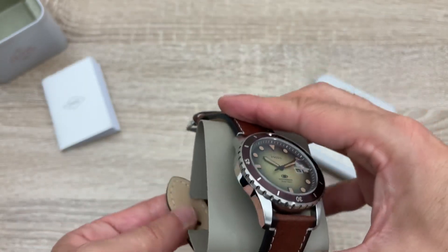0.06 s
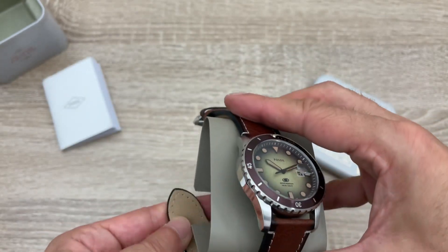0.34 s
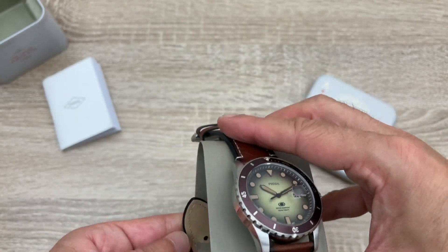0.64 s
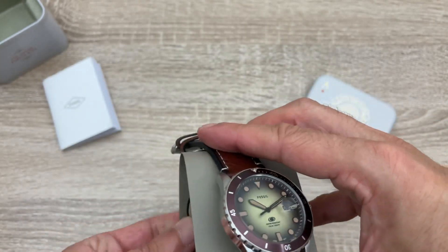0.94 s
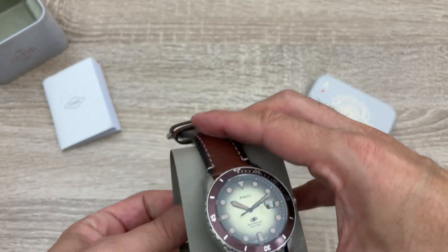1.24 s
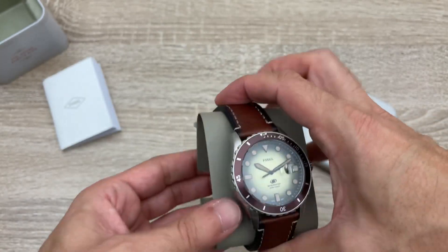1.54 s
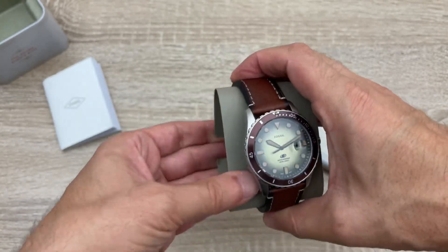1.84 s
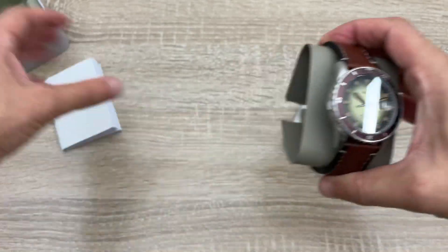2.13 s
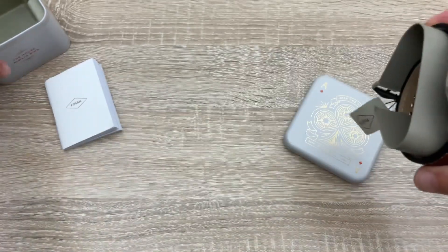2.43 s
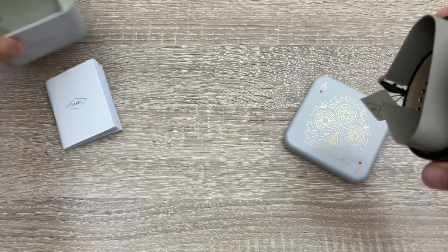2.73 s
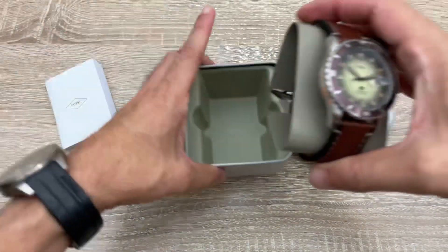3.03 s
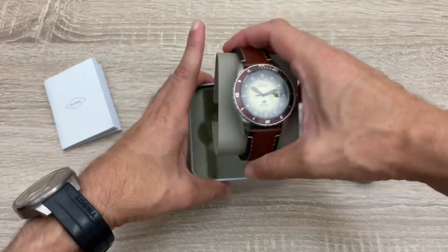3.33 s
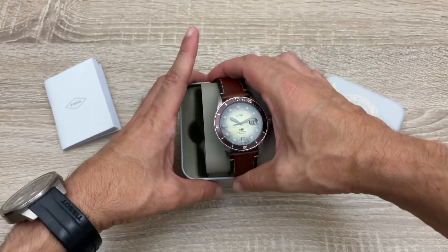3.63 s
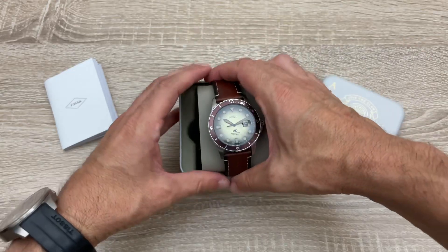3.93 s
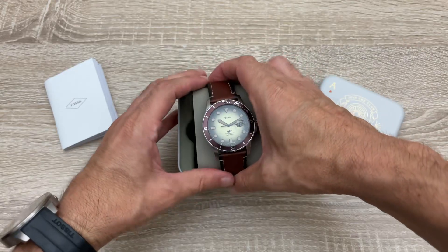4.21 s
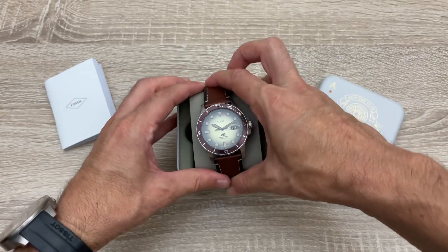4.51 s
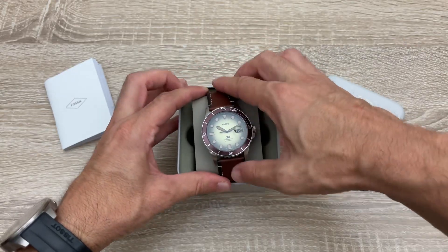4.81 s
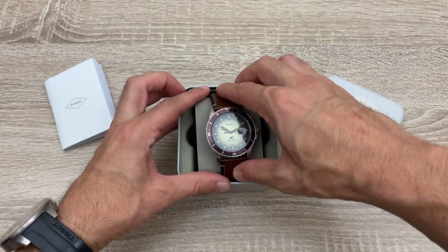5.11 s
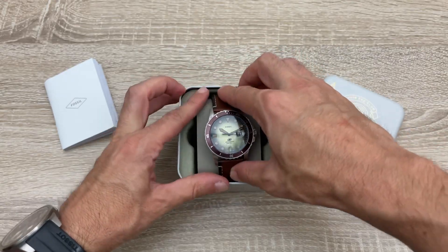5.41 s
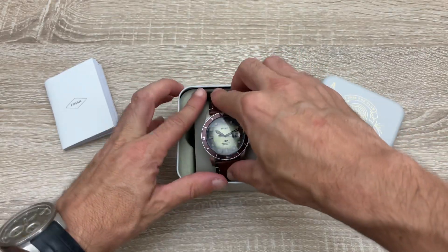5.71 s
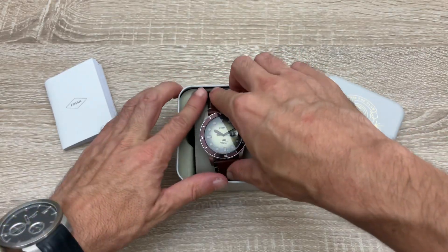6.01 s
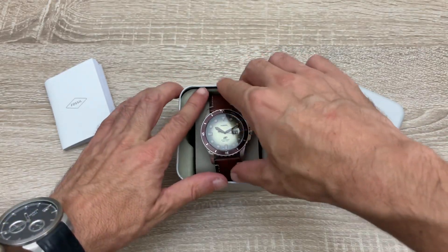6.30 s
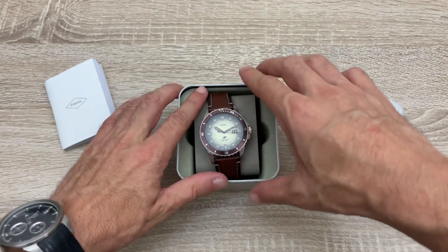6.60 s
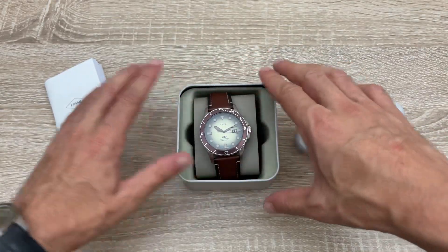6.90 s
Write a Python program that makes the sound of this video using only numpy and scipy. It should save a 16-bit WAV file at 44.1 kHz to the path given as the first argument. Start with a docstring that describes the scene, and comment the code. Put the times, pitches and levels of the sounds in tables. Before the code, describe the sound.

In a small room with a low hum, fingers slide over a leather watch strap while its buckle ticks and clinks. A metal tin then scrapes, lifts and lands on a wooden table with two quick ringing clanks. Short, damped knocks and soft rubbing follow at uneven intervals as the watch and its cushion are pushed inside, ending with a few faint buckle clicks. Everything is heard close, in stereo.

```python
"""Packing a watch into a tin

A watch strapped round a leather cushion is handled over a wooden table: the strap rubs and creaks,
and the steel buckle clicks. An empty tin is picked up and set down, edge first, then flat, ringing
and thumping the table. The cushion is worked into it with scrapes and dull knocks that the grip damps.
A small room echoes and hums low, and a stereo microphone hears it all from close by."""
import sys
import numpy as np
from scipy import signal
from scipy.fft import rfft, irfft
from scipy.io import wavfile
from scipy.ndimage import uniform_filter1d

SR = 44100
rng = np.random.default_rng(int(sys.argv[2]) if len(sys.argv) > 2 else 0)


def generate_wav(signal):
    """Clip the signal to [-1, 1] and save it as 16-bit WAV at the path in sys.argv[1]."""
    frames = np.transpose(np.atleast_2d(signal))
    scaled = np.clip(frames, -1, 1) * 32767
    pcm = np.round(scaled).astype(np.int16)
    wavfile.write(sys.argv[1], SR, pcm)


N = 306495

# A ring time (t60) is how long a sound takes to fade by 60 dB.
FREE_T60_S, GRIPPED_T60_S = 0.46, 0.25  # longest ring of a loose thing and of one held in the hand
# How alike the room sounds left and right. Each row: frequency in Hz, likeness from 0 to 1.
ROOM_LIKENESS = [(100, 1), (300, 0.44), (700, 0.054), (2000, 0.35), (5000, 1), (12000, 1)]


def tin():
    """Set down, the tin rings freely; gripped, it gives short knocks that sound its air and one panel."""
    # The tin lands on its edge, then flat. Each row: start in seconds, level in dB, flatness from 0 to 1,
    # hollow pitch in Hz, hollow boost in dB, clank, tick and fizz in dB, rise and clatter time in
    # seconds, metal ring in dB, table thud in dB.
    landings = [(3.086, 16.5, .2, 1230, 9.5, -17.5, -18.5, -32, 0.00077, 0.067, -2, 18.5),
                (3.115, -1, 0.1, 1030, 8, -0.5, -17, -28, 0.0013, 0.54, 7, -6),
                (3.26, 18.5, .8, 1040, 5.5, -4, -26, -44.5, 0.00015, 0.056, -11, 14.5),
                (3.274, 3.5, .2, 945, 3.5, 0.5, -22, -46, .003, 0.69, -12, -6)]
    # Fingers and cushion bump the tin. Each row: start in seconds, level in dB, hollow pitch in Hz,
    # hollow boost, clank, fizz and table thud in dB, panel pitch in Hz, its level in dB, its ring time
    # in seconds.
    knocks = [(2.531, 5, 796, 6, -36, -59, 1.5, 1134, -43.5, 0.09),
              (2.559, 4.5, 760, 4.5, -28.5, -66, 0.5, 2380, -59.5, 0.14),
              (2.893, -15.5, 900, 12, -27, -30.5, -18, 1260, -46.5, 0.031),
              (3.635, 4.5, 724, 6, -21.5, -67, 1, 1090, -59, 0.048),
              (3.7198, 7, 1000, 7, -13, -55, 0.5, 1100, -44.5, 0.048),
              (4.3047, -0.5, 770, 6, -14.5, -50, -15, 1640, -46, 0.036),
              (4.441, -13, 634, 9, -29, -47, -18, 1440, -60, 0.037),
              (4.4656, 7, 660, 6.5, -23, -38, -0.5, 1750, -45, .04),
              (4.479, 11.5, 843, 8, -17.5, -66, 2, 1595, -32.5, .04),
              (4.6696, 10.5, 807, 11, -25.5, -46, -20, 1656, -39.5, 0.043),
              (4.8167, 7.5, 1940, 9, -18.5, -23.5, 0, 1885, -43, 0.12),
              (4.8195, 4, 720, 5, -30, -55, -6, 2340, -50, 0.06),
              (5.2571, -1.5, 700, 1, -29, -52, -0.5, 1240, -64, .04),
              (5.3188, -7, 925, 12, -5, -25, -26, 1483, -41.5, 0.048),
              (5.3586, 12, 890, 5, -13.5, -26, -7, 1493, -31.5, 0.05),
              (5.3809, 16.5, 720, 1.5, -27, -38.5, 14, 530, -31.5, 0.051),
              (5.396, 2, 550, 11, -23, -50, 2, 586, -35, .04),
              (6.203, 5.5, 770, 5, -29, -40.5, -4, 1674, -47, 0.052),
              (6.2312, 1, 760, 3, -19, -47, -6, 1580, -47, 0.048),
              (6.32, 0.5, 960, 5.5, -17, -27.5, -16.5, 1170, -53, 0.041)]
    out = np.zeros(N)
    for start, *landing in landings:
        add(out, start, strike(*landing, FREE_T60_S))
    for start, db, hollow_hz, hollow_db, clank, fizz, thud_db, panel_hz, panel_db, panel_t60 in knocks:
        tick = (clank + fizz) / 2 - 1
        rise = 0.00013 * 2 ** (-clank / 16)  # 16 dB less clank: the knock swells twice as slowly
        knock = strike(db, 0, hollow_hz, hollow_db, clank, tick, fizz, rise,
                       t60=0.046, ring_db=-20.5, thud_db=thud_db, longest_s=GRIPPED_T60_S)
        air_hoot = note(hollow_hz, db + hollow_db - 58.5, t60=0.04, rise=rise)
        add(out, start, knock)
        add(out, start, air_hoot + note(panel_hz, panel_db, panel_t60, rise))
    return out


def strike(db, flat, hollow_hz, hollow_db, clank, tick, fizz, rise, t60, ring_db, thud_db, longest_s):
    """One hit sounds the hollow tin, rings its metal and thumps the table; a flat hit clatters more."""
    # The tones of the tin. Each row: pitch in Hz, strength in dB, ring time in seconds.
    tin_modes = [(524, -44, 0.2), (885, -60, 0.25), (1012, -47, 0.34), (1070, -49, 0.32), (1266, -49, 0.3),
                 (1470, -44, .09), (1705, -54, 0.3), (1976, -37, 0.15), (2240, -53, .2), (2358, -50, .35),
                 (2643, -55, .45), (3010, -55, .3), (3607, -51, 0.45), (3763, -43, 0.26), (4344, -49, 0.32),
                 (4515, -46, 0.22), (4748, -41, 0.18), (4931, -43, 0.28), (4990, -40, 0.3),
                 (5087, -47, 0.32), (5216, -48, .32), (5717, -52, 0.38), (5841, -47, 0.3),
                 (6560, -49, 0.27), (8340, -45, 0.13), (8651, -42, 0.33), (9119, -36, .25),
                 (10250, -45, .35), (10700, -46, .45)]
    # The tones of the table top. Each row: pitch in Hz, strength in dB, ring time in seconds.
    table_modes = [(95.6, -59, 0.12), (118, -50, 0.11), (146.6, -55.5, 0.13), (210.3, -57.5, 0.15),
                   (263, -50, 0.14), (400.6, -49, 0.069)]
    # Resonances of the tin's floor. Each row: pitch in Hz, half width in Hz, boost in dB.
    floor_peaks = [(550, 20, 5.5), (750, 20, 10), (888, 26, 8.5), (1074, 52, 12.5), (1536, 71, 13.5),
                   (1715, 34, 10), (2020, 40, 9), (2320, 67, 11.5), (2775, 29, 3.5)]
    hz = np.geomspace(60, 16000, num=700)
    slope = [(60, -33), (340, -16), (540, -7.5), (760, -3), (1050, -9), (1400, clank / 2 - 4),
             (2200, clank), (3200, (clank + tick) / 2), (4000, tick), (5500, tick - 3),
             (7300, fizz - 1), (11000, fizz), (13500, fizz - 17), (16000, fizz - 19)]
    box_db = read(slope, hz) + hump(hz, hollow_hz, 0.12 * hollow_hz, hollow_db)
    floor_db = flat * sum(hump(hz, *peak) for peak in floor_peaks)
    colour = np.column_stack([hz, box_db])
    clatter_colour = np.column_stack([hz, box_db + floor_db])
    metal = ring(tin_modes, colour, longest_s)
    # The tin is almost square, so each tone beats against a slightly detuned twin.
    metal += amp(-8.5) * ring(tin_modes, colour, longest_s, spread=0.0091)
    out = amp(db + ring_db) * (metal + shimmer(colour))
    add(out, 0, amp(db) * blow(clatter_colour, rise, t60, snap=0.27))
    thud = ring(table_modes, [(100, 0.067), (400, 0.86)], FREE_T60_S, spread=0.053)
    add(out, 0.0101, amp(thud_db) * thud)  # the heavy table top answers a little late
    return out


def shimmer(colour, db=-51.5, t60=0.24, count=70):
    """Thin sheet metal rings with many weak, high tones."""
    pitches = rng.uniform(2500, 12000, count)
    levels = db + 3 * rng.standard_normal(count)
    return ring(np.column_stack([pitches, levels, np.full(count, t60)]), colour, t60)


def scraping():
    """The tin scrapes on the table, then fingers and cushion rub against it."""
    # The shoves. Each row: start and length in seconds, body level in dB, hiss in dB against the body.
    shoves = [(2.518, 0.12, -52, -24), (3.65, 0.2, -53, -25), (3.915, 0.1, -66, -22),
              (4.045, 0.044, -76.5, -10.5), (4.19, 0.7, -68.5, -7), (4.38, 0.38, -68.5, -3),
              (4.44, 0.13, -52.5, -20), (4.64, 0.19, -62, -6), (4.7, 0.07, -60, -6.5),
              (5.03, 0.17, -58, -11), (5.2, 0.18, -70.5, 2), (5.45, 0.26, -68, -8), (5.7, 0.19, -57, -16),
              (5.98, 0.34, -59, -12), (6.325, 0.072, -58.5, -2), (6.37, 0.16, -64, -7.5),
              (6.68, 0.16, -72.5, -16)]
    # Faint rubbing as the cushion is pressed in. Each row: time in seconds, level in dB.
    pressing = [(3.602, -64), (3.95, -67), (4.15, -73), (4.448, -68.5), (5.6, -58.5), (5.95, -81),
                (6.302, -65), (6.95, -94)]
    # The tone colour of the scraping. Each row: frequency in Hz, level in dB.
    colour = [(150, -4.5), (300, -8.5), (600, -4.5), (850, -4), (1200, -15), (1500, -10.5), (2600, -22.5),
              (5500, -35), (6700, -32.5), (7500, -55), (8600, -38.5), (10400, -40), (12700, -54),
              (14000, -57)]
    pressing_db = np.interp(np.arange(N) / SR, *np.transpose(pressing), left=-np.inf)
    gains = strokes(shoves) + amp([pressing_db, pressing_db - 20.5])  # body, hiss
    return rub(gains, colour, bands=[(450, 4100), (3500, 6600)], split_hz=3600,
               grains_per_s=1200, grain_db=2.0, smooth=0.86, judder_db=1.93)


def buckle():
    """Each click rings the little steel frame and pings at a pitch set by where it is touched."""
    # The clicks. Each row: start in seconds, level, body and fizz in dB, rise in seconds,
    # ping pitch in Hz, ping level in dB, ping ring time in seconds.
    clicks = [(0.079, -28, 2.5, -18, 0.0016, 2690, -68, 0.045),
              (0.3009, -35, 21, -13, 0.00045, 1860, -47, .03),
              (0.3308, -2, -12.5, -18.5, 0.00074, 2760, -39.5, 0.036),
              (0.39, -17.5, -10, -23, 0.0012, 2760, -52, 0.035),
              (.698, -33, 4.5, -23, 0.0016, 3650, -61, .04),
              (0.8732, -12.5, 1.5, -2, 0.0016, 1850, -36, 0.044),
              (0.8771, -15.5, 10, -9, 0.00022, 2330, -44, 0.095),
              (1.481, -32, 7, -4.5, 0.00092, 2770, -70, .05),
              (1.664, -41, 17.5, -3, 0.0025, 2050, -67, .05),
              (1.673, -35.5, 0, -2, 0.00098, 3380, -77, .05),
              (1.895, -23, -26, -5, 0.00031, 6020, -51, 0.039),
              (1.921, -24.5, -2, -13, 0.0053, 3400, -68, .05),
              (5.606, -31, 2, -13, .0015, 2750, -73, 0.059), (6.34, -33, 0, -8, .001, 3020, -66, .04),
              (6.358, -23, 1.5, -18, 0.0025, 2350, -71, .05)]
    # The tones of the buckle. Each row: pitch in Hz, strength in dB, ring time in seconds.
    steel_modes = [(2126, -36, 0.2), (2680, -35, 0.11), (3270, -34, 0.07), (3500, -33, 0.06),
                   (4320, -24, 0.065), (4377, -42, 0.22), (5240, -38, .13), (5080, -14, 0.014),
                   (5400, -19, 0.014), (5990, -38, 0.09), (8280, -34, .05), (9184, -46, 0.23),
                   (10380, -46, 0.22)]
    out = np.zeros(N)
    for start, db, body, fizz, rise, ping_hz, ping_db, ping_t60 in clicks:
        colour = [(100, body - 18), (900, body - 13), (1900, body), (2900, body / 2 + 3), (4500, -9),
                  (6500, -8.5), (8500, fizz / 2), (11000, fizz), (16000, fizz - 3)]
        click = amp(-8.5) * ring(steel_modes, colour, GRIPPED_T60_S)
        add(click, 0, blow(colour, rise, t60=0.037, snap=1.0))
        add(out, start, amp(db) * click)
        add(out, start, note(ping_hz, ping_db, ping_t60, rise))
    return out


def strap():
    """The leather strap slides under the fingers in short strokes."""
    # The strokes. Each row: start and length in seconds, body level in dB, hiss in dB against the body.
    slides = [(0, 0.17, -72, -3), (.21, 0.33, -69, -1), (.47, 0.18, -76.5, 6), (.61, 0.36, -76.5, 11.5),
              (.83, 0.24, -66.5, 7), (.99, 0.22, -62.5, 6), (1.17, 0.12, -67.5, -4),
              (1.45, 0.53, -78.5, 12), (1.495, 0.078, -71.5, 7), (1.6, 0.023, -82, 18),
              (1.7, 0.065, -75, 9), (1.81, 0.29, -70.5, 7.5), (4.455, 0.052, -67, 18),
              (4.655, 0.081, -64.5, 11.5)]
    # The tone colour of the strap. Each row: frequency in Hz, level in dB.
    colour = [(500, -26), (900, -46), (1400, -9), (1880, 4.5), (2150, 0.5), (2730, 0.5), (3050, -5),
              (3470, 0), (6200, -7.5), (7700, -19.5), (9100, -11.5), (10800, -21.5), (16000, -34)]
    return rub(strokes(slides), colour, bands=[(1500, 22000), (8500, 16000)], split_hz=13900,
               grains_per_s=2100, grain_db=2.5, smooth=1.0, judder_db=3.0)


def creak(slips_per_s=170, unevenness=0.35):
    """Taut leather slips in a quick, uneven train, and each slip rings the strap anew."""
    # Pulls round the cushion. Each row: start in seconds, length in seconds, level in dB.
    pulls = [(1.001, .14, -64.5), (1.059, 0.076, -60)]
    # The tones of the taut strap. Each row: pitch in Hz, strength in dB, ring time in seconds.
    leather_modes = [(1830, -3, 0.032), (2374, -4.5, 0.039), (3400, -6, 0.023), (4580, -14, 0.037),
                     (6300, -5, 0.021), (10100, -8, 0.011), (11100, -6.5, 0.012)]
    out = np.zeros(N)
    for start, length, db in pulls:
        train = np.zeros(SR)
        gaps = np.exp(unevenness * rng.standard_normal(80)) / slips_per_s
        times = np.cumsum(gaps)
        for time in times[times < length]:
            slip = ring(leather_modes, [(1000, 0)], GRIPPED_T60_S, spread=0.016)
            add(train, time, np.sin(np.pi * time / length) * slip)
        add(out, start, amp(db) * np.sqrt(length) * evened(train))
    return out


def blow(colour, rise, t60, snap, size=16384):
    """One contact: a burst of clatter whose treble dies first, led by a spike if the hit is hard."""
    t, hz = np.arange(size) / SR, bins(size)
    rise = np.clip(rise, 1e-4, 0.005)
    treble = 1 / (1 + (2500 / (hz + 1)) ** 4)
    noise = rng.standard_normal(size) * (1 - np.exp(-(t / rise) ** 2))
    spectrum = 0
    for fade_s, share in (t60, 1 - treble), (t60 * 0.44, treble):
        clatter = noise * amp(-60 * t / max(fade_s, 0.006))
        spectrum += rfft(clatter) / np.linalg.norm(clatter) * share
    spectrum += snap * np.exp(-rise / 0.0012)  # the spike
    spectrum = flattened(spectrum, width=220) * sharp_pulse(read(colour, hz))
    return irfft(spectrum)[:size // 2]


def ring(modes, colour, longest_s, spread=0.0018):
    """A struck thing's own tones (modes) fade away, each fed by the hit's colour at its pitch."""
    hz, db, t60 = np.transpose(modes)[:, :, None]
    t = np.arange(SR // 2) / SR
    fall_db = -60 * t / np.minimum(t60, longest_s)
    pitch = hz * (1 + spread * rng.standard_normal(hz.shape))  # a little different on every hit
    sign = rng.choice([-1, 1], hz.shape)
    tones = sign * amp(db + read(colour, hz) + fall_db) * np.sin(2 * np.pi * pitch * t)
    return tones.sum(0)


def note(hz, db, t60, rise):
    """The one tone a contact stirs most: it swells with the contact and dies quickly."""
    t = np.arange(SR // 4) / SR
    swell = 1 - np.exp(-t / rise)
    return amp(db - 60 * t / t60) * swell * np.sin(2 * np.pi * hz * t)


def rub(gains, colour, bands, split_hz, grains_per_s, grain_db, smooth, judder_db):
    """Surfaces stick and slip in clumps of tiny grains, making a lower body and a higher hiss."""
    hz = bins(N)
    slips = (rng.random(N) < grains_per_s / SR) * rng.choice([-1, 1], N)
    slips = slips * amp(grain_db * np.minimum(rng.exponential(1, N), 4))
    wobble = irfft(rfft(rng.standard_normal(N)) * (hz > 15) * (hz < 90), N)
    judder = amp(judder_db * evened(wobble))
    friction = judder * (evened(slips) + smooth * rng.standard_normal(N))
    spectrum = rfft(patchy(friction)) * amp(read(colour, hz))
    low = 1 / (1 + (hz / split_hz) ** 4)
    out = np.zeros(N)
    for gain, share, (from_hz, to_hz) in zip(gains, (low, 1 - low), bands):  # body, then hiss
        band_level = irfft(spectrum * (hz > from_hz) * (hz < to_hz), N).std()
        out += gain * irfft(spectrum * share, N) / band_level
    return out


def strokes(rows, peak_share=0.18):
    """Gains of body and hiss over time: every stroke speeds up quickly and slows to rest."""
    t, gains = np.arange(N) / SR, np.zeros((2, N))
    for start, length, db, hiss_db in rows:
        ramp = np.interp((t - start) / length, [0, peak_share, 1], [0, 1, 0])
        speed = np.sin(np.pi / 2 * ramp) ** 2
        gains += amp([[db], [db + hiss_db]]) * speed
    return gains


def patchy(sound, flare_db=3):
    """The point of contact wanders, so narrow bands of pitch flare up briefly."""
    frames = signal.stft(sound, nperseg=512, noverlap=384)[2]
    patches = uniform_filter1d(rng.standard_normal(frames.shape), size=5, axis=0)
    patches = evened(uniform_filter1d(patches, size=9, axis=1))
    return signal.istft(frames * amp(flare_db * patches), nperseg=512, noverlap=384)[1][:N]


def room(sound):
    """A small, hard room sends back dense echoes that die sooner in the treble."""
    # How long the room rings. Each row: frequency in Hz, ring time in seconds.
    ring_times = [(100, 0.52), (300, 1), (800, 0.52), (2000, 0.49), (5000, .52), (12000, 0.14)]
    # How loud the echoes are. Each row: frequency in Hz, level in dB against the sound sent in.
    echo_levels = [(100, 2), (300, -5), (900, -3), (2000, -5), (5000, -6.5), (12000, -9)]
    hz, t, frames = signal.stft(rng.standard_normal((2, SR)), SR, nperseg=256)
    fade = amp(-60 * t / read(ring_times, hz)[:, None])
    tail = signal.istft(frames * fade, SR, nperseg=256)[1][:, :SR]
    onset = np.clip((np.arange(SR) / SR - 0.004) / 0.00066, 0, 1)  # the first echo takes 4 ms
    spectra = flattened(rfft(tail * onset), width=160)
    hz = bins(SR)
    echoes = irfft(pair(*spectra, read(ROOM_LIKENESS, hz)) * amp(read(echo_levels, hz)))
    return signal.fftconvolve(sound[None], echoes, axes=1)[:, :N]


def hum(noise_db=-57.5):
    """Low, steady room noise with a few wavering tones."""
    # The tone colour of the noise. Each row: frequency in Hz, level in dB.
    colour = [(12, -58.5), (20, -24), (37, -10.5), (68, -16), (101, -2), (177, -16), (210, -9.5),
              (277, -18.5), (310, -24), (347, -18.5), (422, -26), (1400, -32.5), (1910, -45), (3530, -49),
              (16000, -63.5)]
    # The low tones of the room. Each row: pitch in Hz, half width in Hz, level in dB.
    drones = [(61.3, 2.4, -65), (90.7, 5.6, -67.5), (227.3, 14, -76), (264.6, 28, -70)]
    hz = bins(N)
    spectra = pair(*rfft(rng.standard_normal((2, N))), read(ROOM_LIKENESS, hz))
    out = amp(noise_db) * evened(irfft(spectra * amp(read(colour, hz)), N))
    for centre_hz, width_hz, db in drones:
        narrow_band = rfft(rng.standard_normal(N)) * hump(hz, centre_hz, width_hz, 1)
        out += amp(db) * evened(irfft(narrow_band, N))
    return out


def amp(db):
    """Turns decibels into a gain."""
    return 10 ** (np.asarray(db) / 20)


def evened(sound):
    """Scales a sound to an average (rms) level of 1."""
    return sound / np.sqrt(np.mean(sound ** 2) + 1e-20)


def flattened(spectrum, width):
    """Levels out a spectrum's broad hills and keeps its fine ripples."""
    return spectrum / np.sqrt(uniform_filter1d(abs(spectrum) ** 2, size=width))


def read(points, hz):
    """Reads a curve through (Hz, value) points on a log-frequency axis."""
    point_hz, values = np.transpose(points)
    return np.interp(np.log(hz + 1), np.log(point_hz + 1), values)


def hump(hz, centre_hz, width_hz, height):
    """The bell-shaped rise round one resonance."""
    return height / (1 + ((hz - centre_hz) / width_hz) ** 2)


def bins(size):
    """The frequencies in Hz of the spectrum of this many samples."""
    return np.fft.rfftfreq(size, 1 / SR)


def add(mix, start, sound):
    """Mixes a sound in at a start time in seconds."""
    part = mix[max(round(start * SR), 0):][:len(sound)]
    part += sound[:len(part)]


def sharp_pulse(colour_db):
    """The spectrum of the sharpest-starting pulse that has this tone colour."""
    cepstrum = irfft(np.log(amp(colour_db)))
    half = len(cepstrum) // 2
    cepstrum[1:half] *= 2
    cepstrum[half + 1:] = 0  # nothing sounds before the hit
    return np.exp(rfft(cepstrum))


def pair(left, other, likeness):
    """Blends two unrelated spectra into a partly alike left and right."""
    return np.array([left, likeness * left + np.sqrt(1 - likeness ** 2) * other])


def scene():
    """Watch and tin sound in the room; the watch is nearer the microphone, so it has less echo."""
    rubbing, scrapes = strap(), scraping()
    watch = buckle() + rubbing + creak()
    box = tin() + scrapes
    return watch + box + room(box + amp(-7) * watch) + hum()


def record(dry, low_cut_hz=38, top_hz=16050):
    """The microphone's two sides differ in level and timing; deep bass and top treble are cut."""
    # The balance of the sides. Each row: frequency in Hz, how much louder the left is in dB.
    balance = [(60, 2), (900, 3.5), (2500, 2.5), (4500, 6.5), (8000, 0), (14000, 0.5)]
    # The timing of the sides. Each row: frequency in Hz, how far the left leads in radians.
    lead = [(100, 0), (1000, 0.24), (3500, 1), (5200, 1), (6500, -2.5), (8700, -4.5), (10000, -5),
            (15500, -10.5)]
    hz = bins(N)
    left_gain = amp(read(balance, hz) / 2) * np.exp(1j * read(lead, hz) / 2)
    stereo = irfft(rfft(dry) * np.array([left_gain, 1 / left_gain]), N)
    low_cut = signal.butter(2, low_cut_hz, "highpass", fs=SR, output="sos")
    top_cut = signal.firwin(511, top_hz, window=("kaiser", 9), fs=SR)
    return signal.oaconvolve(signal.sosfilt(low_cut, stereo), top_cut[None], "same")


dry = scene()
out = record(dry)
generate_wav(out)
```